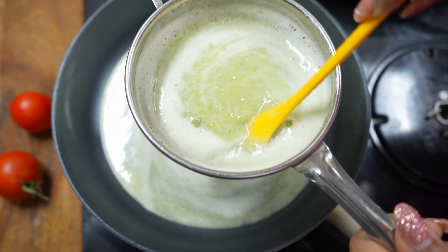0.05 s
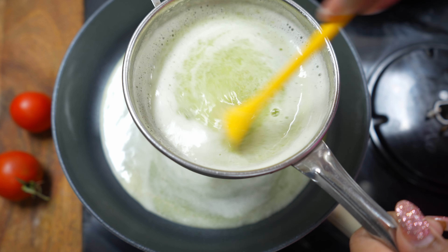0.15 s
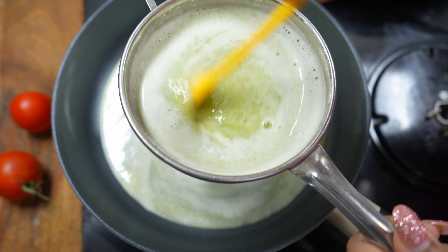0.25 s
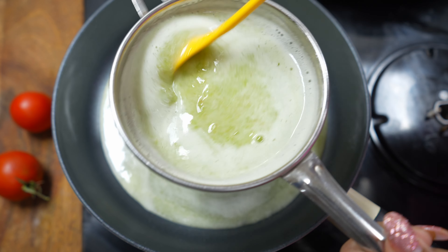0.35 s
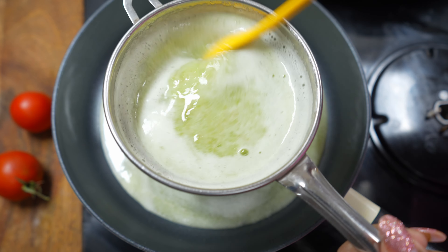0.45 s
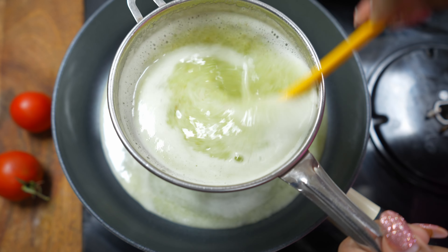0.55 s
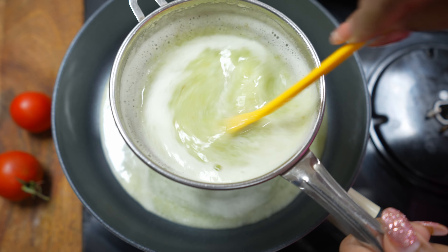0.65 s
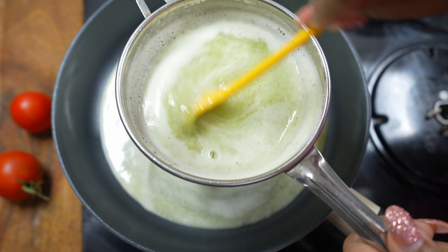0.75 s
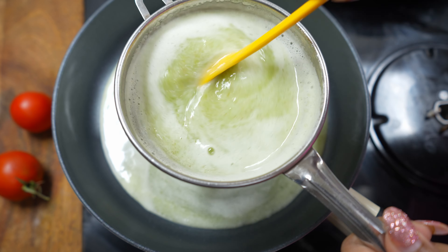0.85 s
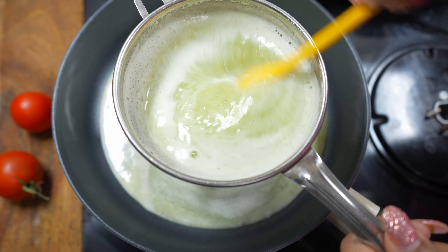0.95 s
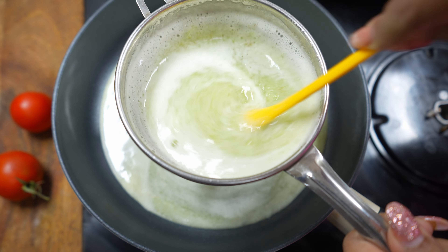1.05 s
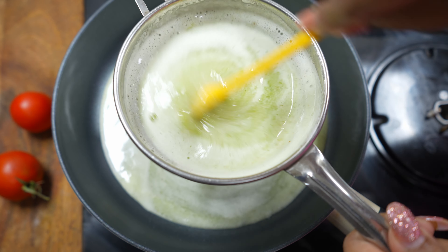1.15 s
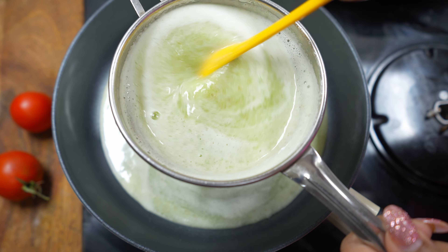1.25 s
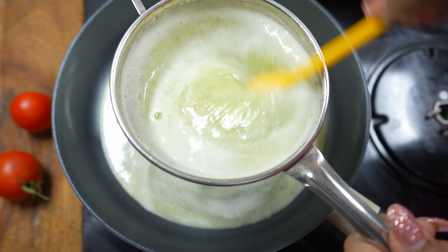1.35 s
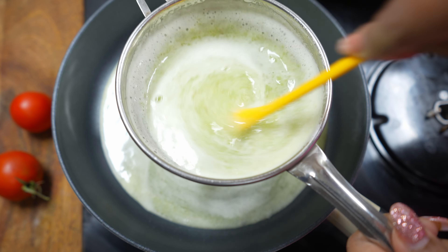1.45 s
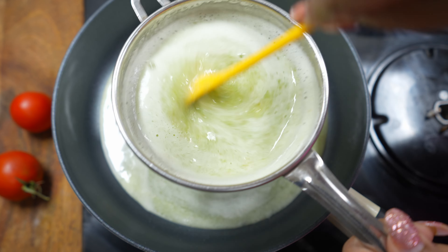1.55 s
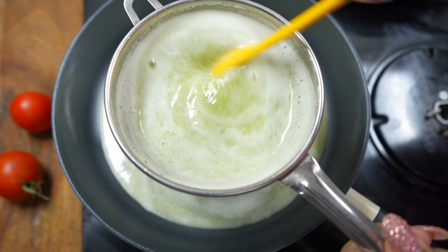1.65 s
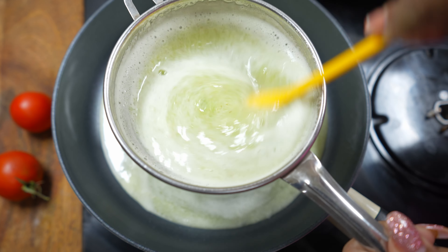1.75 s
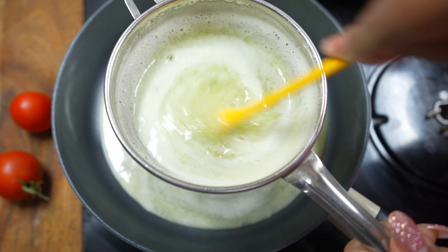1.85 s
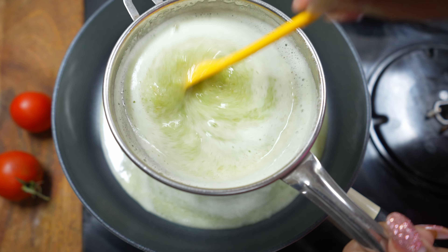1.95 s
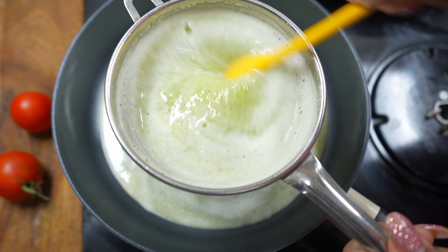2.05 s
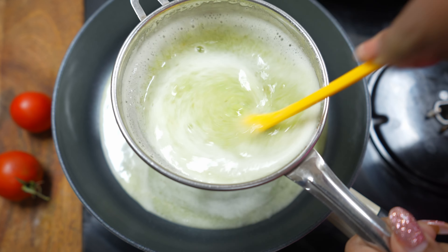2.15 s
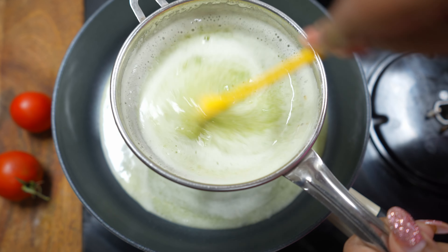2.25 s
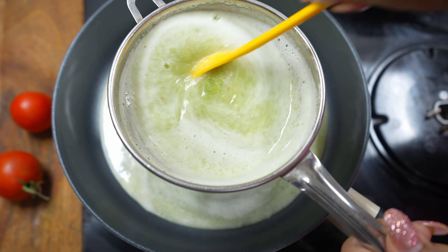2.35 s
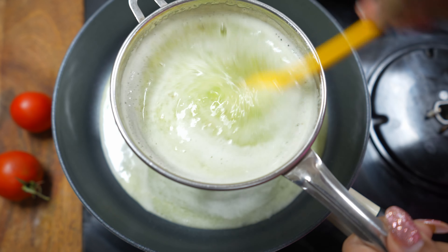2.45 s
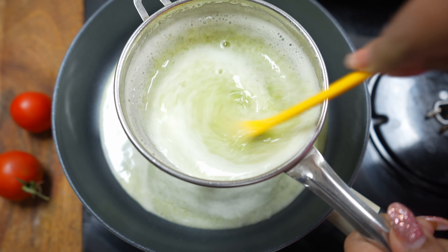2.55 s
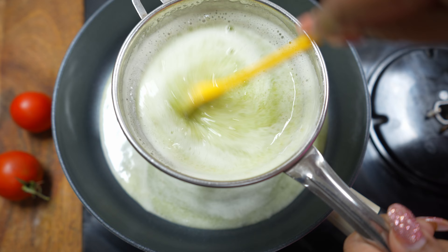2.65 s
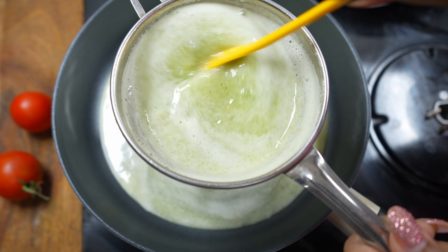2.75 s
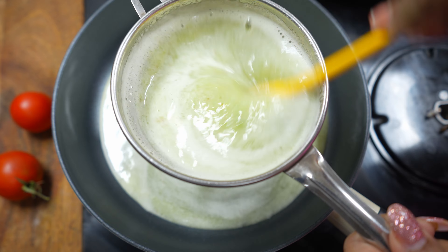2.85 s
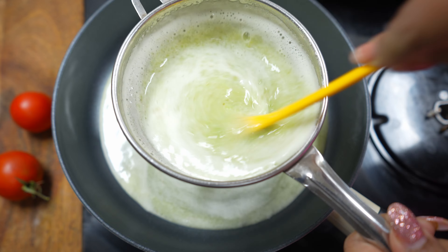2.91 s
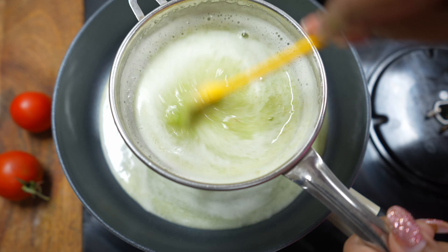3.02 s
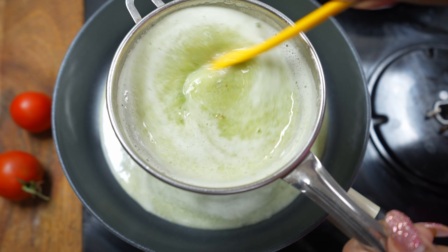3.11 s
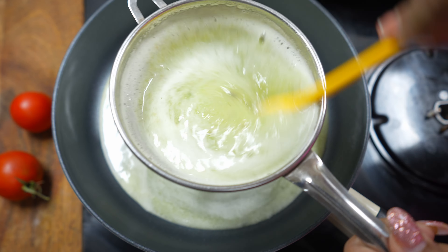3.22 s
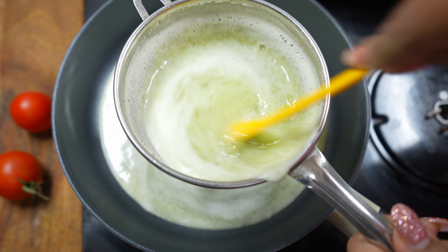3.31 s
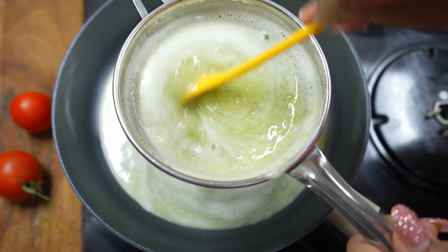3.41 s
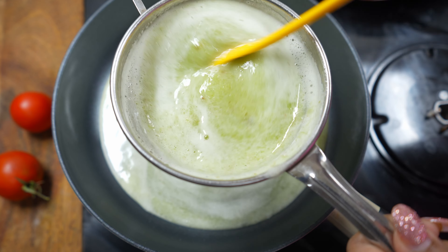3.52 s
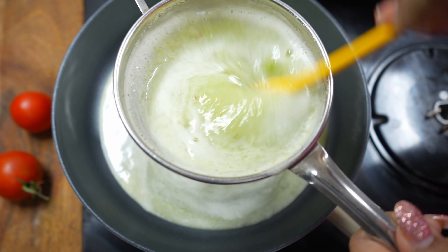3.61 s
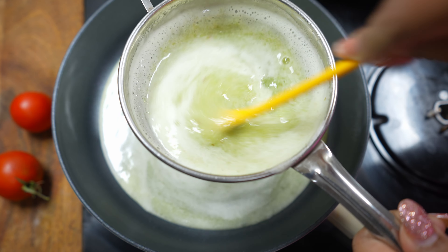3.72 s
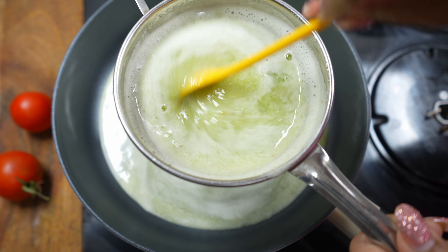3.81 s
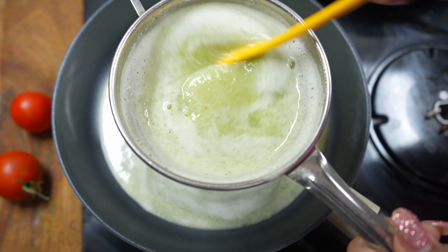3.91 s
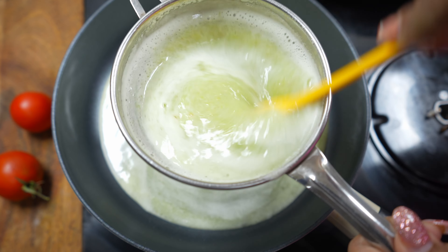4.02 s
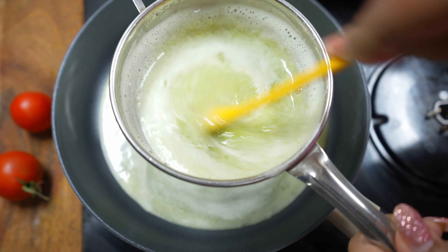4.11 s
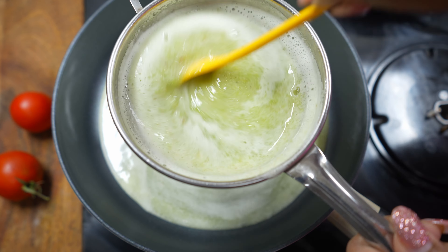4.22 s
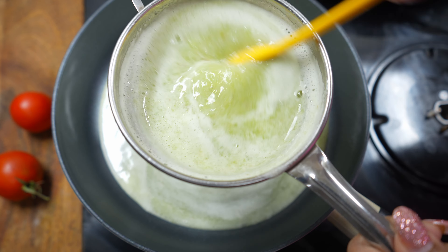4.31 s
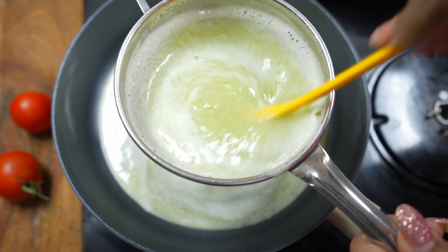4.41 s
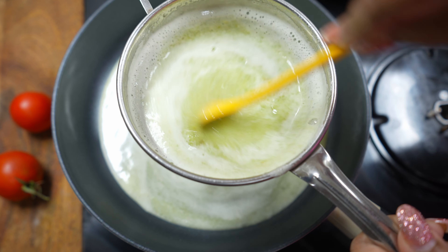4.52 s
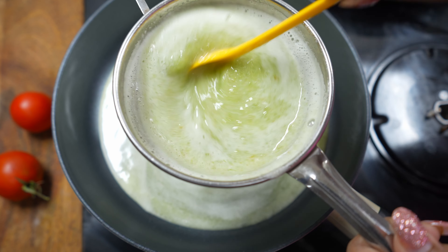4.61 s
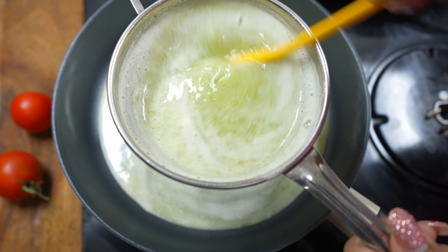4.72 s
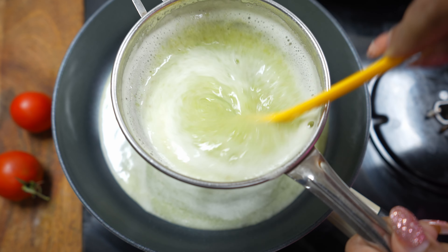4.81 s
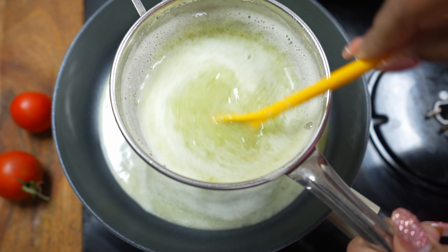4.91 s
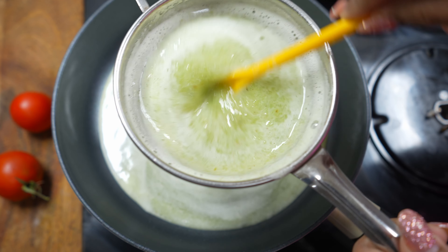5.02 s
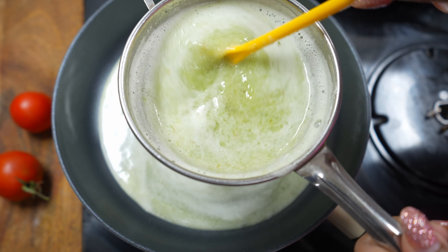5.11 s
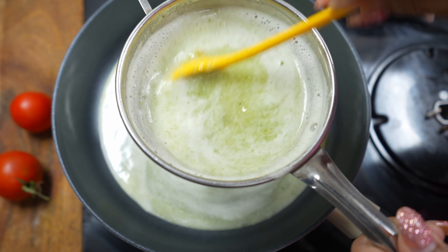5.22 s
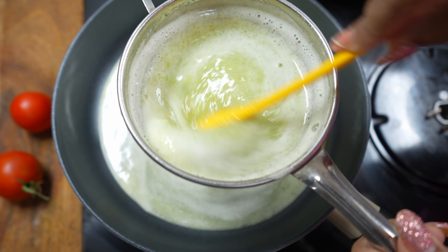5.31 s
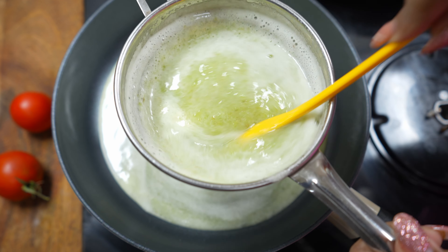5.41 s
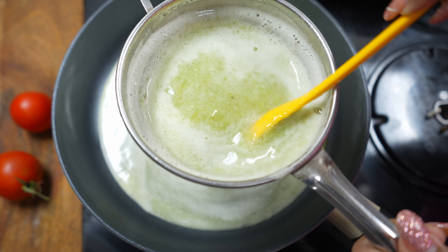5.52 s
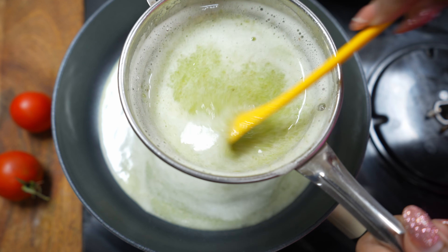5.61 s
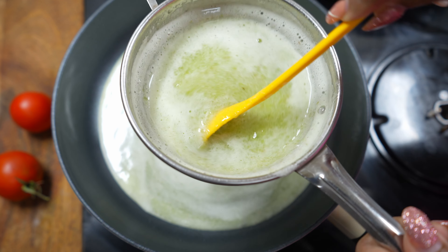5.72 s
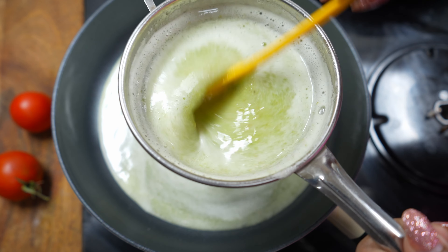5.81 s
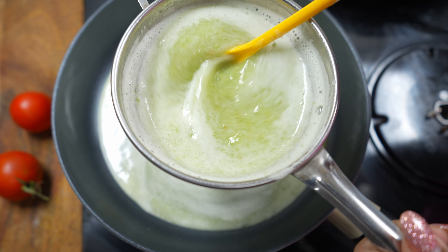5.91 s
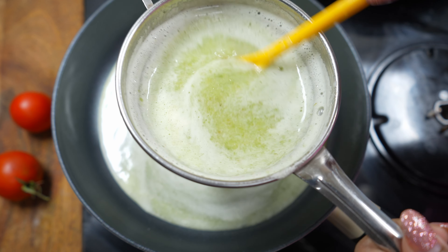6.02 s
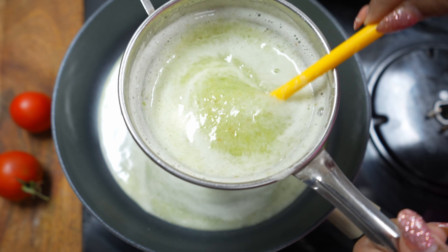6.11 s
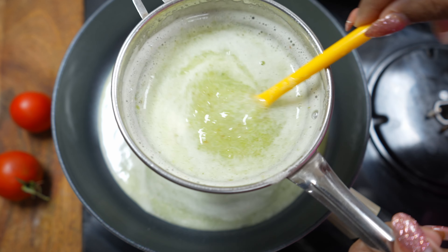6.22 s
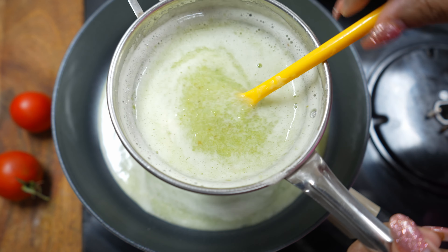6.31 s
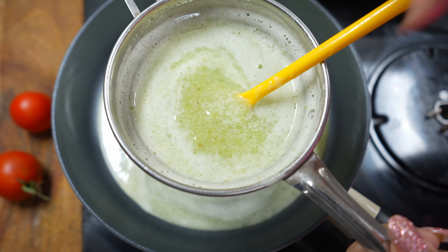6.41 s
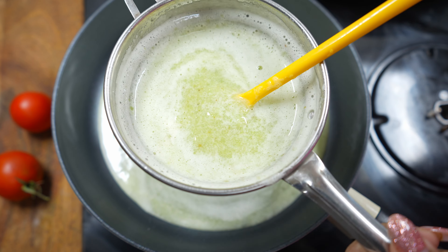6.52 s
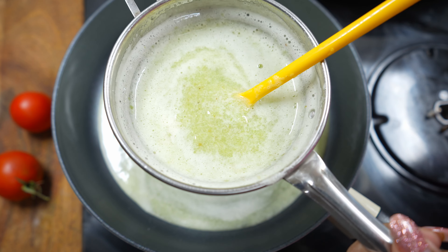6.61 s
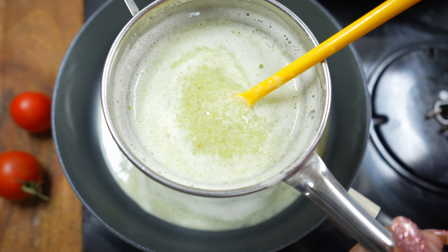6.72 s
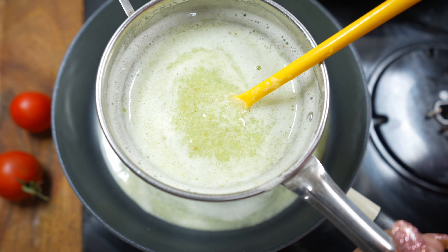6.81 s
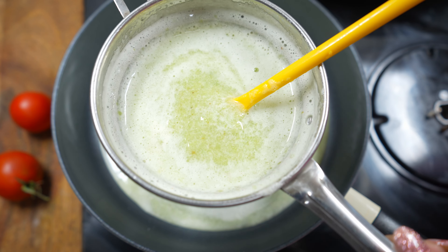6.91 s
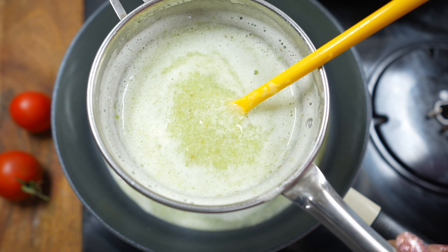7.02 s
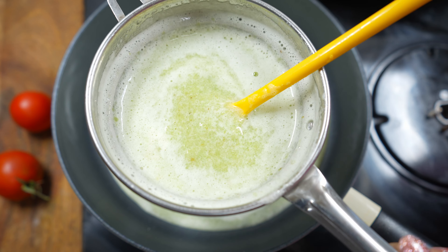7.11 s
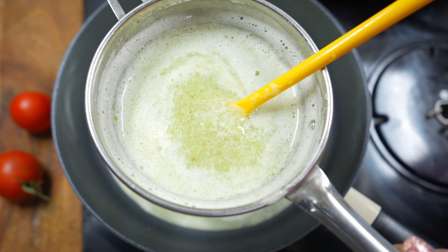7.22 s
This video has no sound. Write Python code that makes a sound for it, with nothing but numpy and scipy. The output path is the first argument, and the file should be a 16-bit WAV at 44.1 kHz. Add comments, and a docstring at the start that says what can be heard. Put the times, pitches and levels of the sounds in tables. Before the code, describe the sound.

A silicone blade briskly stirs thin puree in a steel sieve: low buzzy rubbing, wet slaps, occasional bright rim clinks, then near quiet.

```python
"""Wet, droning strokes, five or six a second, as a silicone spatula stirs puree round a steel mesh strainer.
Each bites, swells and eases off over a light drag: stick-slip of the blade excites the modes of the mesh,
the puree squelches, foam bursts and the wires rasp. Now and then the blade slaps or judders, and the frame
clinks and chatters on the bowl, once with a squeal. The stirring slows and stops, and the strainer is
shifted softly. A small kitchen adds its murmur and its reflections."""
import sys
import numpy as np
from scipy import signal
from scipy.fft import rfft, irfft
from scipy.io import wavfile
from scipy.ndimage import uniform_filter1d, minimum_filter1d, map_coordinates

SR = 44100
rng = np.random.default_rng(int(sys.argv[2]) if len(sys.argv) > 2 else 0)


def output_pcm(signal):
    """Save a mono or channel-first signal as 16-bit PCM at the path in sys.argv[1].

    Samples are clipped to [-1, 1] before scaling.
    """
    pcm = np.clip(np.atleast_2d(signal).T, -1, 1) * 32767
    wavfile.write(sys.argv[1], SR, np.round(pcm).astype(np.int16))


N = 319900
TIME = np.arange(N) / SR
BINS = np.fft.rfftfreq(16384, 1 / SR)  # frequency axis of every body's gain, Hz

# strokes of the blade: start_s, rise_s, ease_s, slip_rate_hz, belly_db (drag on the slack belly of the mesh),
# and relative to that: wall_db (taut wall), squelch_db (puree), rasp_db (wires)
BLADE_STROKES = [(-0.03, 0.025, 0.051, 441, -18.5, -3.5, -23, -22.5),
                 (0.152, 0.049, 0.019, 569.2, -14.5, 1.5, -8.5, -11.5),
                 (0.276, 0.011, 0.062, 438.4, -22.0, 0, -4.5, -8.5),
                 (0.38, 0.041, 0.041, 410.0, -26, -8, -4.5, -10.0),
                 (0.536, 0.0098, 0.035, 410.0, -6, -5.5, -12.5, -15.5),
                 (0.735, 0.027, 0.11, 500.5, -21.5, -0.5, -13.5, -27),
                 (0.835, 0.122, 0.12, 470.8, -15.5, -11, -19.5, -24),
                 (1.062, 0.099, 0.1, 530.0, -16, -1.5, -14, -21.0),
                 (1.231, 0.051, 0.069, 550.0, -18, -10, -16.5, -19.5),
                 (1.357, 0.02, 0.043, 430.0, -13, -8, -31, -26.5),
                 (1.462, 0.068, 0.092, 470.4, -15, -3, -16, -20.5),
                 (1.697, 0.071, 0.099, 551.2, -15.5, -10, -25, -22),
                 (1.84, 0.091, 0.042, 558.6, -13, -1.5, -19, -21),
                 (2.0, 0.052, 0.07, 499.7, -18.5, -16, -36, -26.0),
                 (2.101, 0.022, 0.11, 490.0, -13.5, -8, -24, -22.5),
                 (2.226, 0.073, 0.04, 560.0, -14.5, 0.5, -16, -22),
                 (2.391, 0.12, 0.039, 441.3, -14, -9.5, -32, -25),
                 (2.606, 0.039, 0.069, 470.2, -13.5, 0, -12.5, -19),
                 (2.769, 0.14, 0.011, 450.3, -10, -7, -22.5, -22),
                 (2.978, 0.079, 0.049, 539.8, -17.5, 2.5, -13.5, -20.5),
                 (3.15, 0.048, 0.01, 440.4, -15.0, -4.0, -25, -19.5),
                 (3.335, 0.039, 0.1, 480.0, -16, -2, -19.0, -19.5),
                 (3.577, 0.068, 0.086, 559.7, -12.5, -6, -25, -20.5),
                 (3.709, 0.044, 0.108, 490.0, -19.5, -1, -17.5, -17.5),
                 (3.883, 0.091, 0.01, 549.4, -22.0, -4, -26, -23.0),
                 (4.046, 0.0099, 0.039, 530.0, -19.5, -6, -16.5, -13),
                 (4.077, 0.076, 0.11, 549.4, -17.5, -0.5, -16, -20.0),
                 (4.334, 0.078, 0.054, 559.4, -12, -3.5, -19, -18.5),
                 (4.48, 0.15, 0.0098, 480.2, -17.5, -1, -14.5, -15.5),
                 (4.734, 0.088, 0.04, 580.0, -11.5, -5.5, -13.5, -18.5),
                 (4.975, 0.027, 0.093, 589, -21.0, 4, -14, -24),
                 (5.251, 0.094, 0.071, 430.4, -17.0, -4, -14.0, -17.5),
                 (5.586, 0.102, 0.019, 419.8, -19, 1, -13.5, -15),
                 (6.038, 0.082, 0.019, 479.8, -27.5, 1.0, -5.5, -14)]


def amp(db):
    """Level law: decibels to amplitude gain."""
    return 10 ** (np.asarray(db) / 20)


def evened(x):
    """Power normalisation: scales to rms 1."""
    return x / np.sqrt(np.mean(x ** 2) + 1e-20)


def read(points, hz):
    """Spectral interpolation: reads a table on a log-frequency axis."""
    point_hz, value = np.transpose(points)
    return np.interp(np.log(hz + 1), np.log(point_hz), value)


def add(mix, s, sound):
    """Superposition: mixes a sound in at time s."""
    part = mix[max(round(s * SR), 0):][:len(sound)]
    part += sound[:len(part)]


def wander(size, hz):
    """Band-limited chance: random knots, hz of them a second, joined by lines, with an expected rms of 1."""
    knots = rng.standard_normal(8192)
    line = map_coordinates(knots, [np.arange(size) * hz / SR], order=1, mode="wrap")
    return line * np.sqrt(3 / 2)  # the lines between knots lose a third of the power


def ring(gain):
    """Minimum phase: causal impulse response of energy 1 whose spectrum has the shape of gain on BINS."""
    cepstrum = irfft(np.log(np.maximum(gain / gain.max(), 1e-5)))
    half = len(BINS) - 1
    folded = 2 * cepstrum * (np.arange(2 * half) < half)  # the causal half alone
    response = irfft(np.exp(rfft(folded) - cepstrum[0]))[:half]
    return response / np.linalg.norm(response)


def modal(modes):
    """Modal superposition: the powers of the resonances add."""
    power = sum(amp(db) ** 2 / (1 + (2 * (BINS - hz) / width) ** 2) for hz, width, db in modes)
    return np.sqrt(power)


def band(low_hz, high_hz, order):
    """Band limitation: gain of a pass band with sloping skirts."""
    low_skirt = 1 + (low_hz / (BINS + 1)) ** (2 * order)
    high_skirt = 1 + (BINS / high_hz) ** (2 * order)
    return 1 / np.sqrt(low_skirt * high_skirt)


def through(x, gain):
    """Linear response: convolves a drive with the ring of a body."""
    return signal.oaconvolve(x, ring(gain))


def slips(size, per_s, jitter, spread_db):
    """Stick-slip: pulses at an unsteady rate and of uneven size, with a steady mean power of 1."""
    turns = np.cumsum(per_s * np.exp(jitter * wander(size, 300))) / SR
    releases = np.diff(np.floor(turns), prepend=-1)
    pulses = releases * amp(spread_db * rng.standard_normal(size))
    power = abs(uniform_filter1d(pulses ** 2, size=1500))
    return pulses / np.sqrt(power + 1e-9)


def mesh_gains():
    """Modal radiation of the belly and the wall; the open mesh radiates little bass."""
    # modes of the loaded mesh, slack belly and taut wall: pitch_hz, width_hz, level_db
    belly_modes = [(161.7, 20, -13.5), (277.7, 13.3, -7), (329.6, 9.6, -5.5), (351.3, 19, -4.5),
                   (414.7, 25, 3), (438, 28, -2.5), (506.3, 29, -1), (546, 28, -8.5), (566.2, 21.7, 2.5),
                   (663, 21, -1.5), (686.5, 15.4, 0), (757.4, 12.5, -5)]
    wall_modes = [(790, 15, -8), (827, 18.3, -3), (906, 9.7, -7), (955, 15.5, -3), (1017, 13.5, 0),
                  (1035, 26, -1), (1069, 29, -2.5), (1172, 21, -4.5), (1288, 15.6, -1.5), (1353, 31, -5.5),
                  (1391, 23, -6.5), (1441, 26, -9.5), (1580, 14, -21)]
    belly = modal(belly_modes) * band(143, 910, order=2) * band(11, 1170, order=4)
    wall = modal(wall_modes) * band(700, 1510, order=3)
    return belly, wall


def air():
    """Stationary noise: a steady low murmur of the room with a little hiss, shaped in frequency."""
    # spectrum of the quiet kitchen: frequency_hz, level_db
    murmur_spectrum = [(15, -54), (25, -26), (64, -12), (82, -6.5), (246, -3.5), (313, -3), (445, 1),
                       (782, -9.5), (1240, -11), (3090, -20.5), (3830, -16.5), (4750, -22), (15500, -32.5)]
    hz = np.fft.rfftfreq(N, 1 / SR)
    spectrum = rfft(rng.standard_normal(N)) * amp(read(murmur_spectrum, hz))
    return amp(-51.5) * evened(irfft(spectrum, N))


def pressure():
    """Contact force: gains of belly, wall, squelch and rasp, from a light drag, its lifts and the strokes."""
    # light drag of the blade between the strokes: time_s, belly_db
    light_drag = [(0.0, -29.5), (0.1, -41), (0.3, -30), (0.5, -44.5), (0.68, -30.5), (0.9, -30),
                  (2.6, -28.5), (3.4, -25), (4.6, -28.5), (4.92, -37.5), (5.2, -53.5), (5.8, -46.5),
                  (6.2, -48.5), (6.3, -57.6)]
    # moments when the drag changes, mostly as the blade lifts off the mesh: time_s, half_length_s, change_db
    blade_lifts = [(0.1, 0.028, -5), (.26, .015, -9), (1.445, 0.012, 1.5), (1.675, 0.015, -12),
                   (2.585, .022, -4), (3.135, .02, -6.5), (3.245, 0.034, -8), (3.558, .016, -10),
                   (4.032, .014, -10.5)]
    drag_parts_db = [0, 1.36, -8.5, -12]  # belly, wall, squelch, rasp relative to the belly
    trims_db = [-0.15, -0.3, 0.12, 0.9]  # the same four parts
    bite_power, eased_db, release_s, off_db = 0.58, -8, .2, -60  # levels relative to the crest
    # small random unevenness in loudness, its rms and rate
    uneven_db, uneven_hz = 1.0, 21.885
    rest_s = 6.3  # the blade lies still from here on

    t = np.arange(0, N / SR, 1 / 1000)
    contact_db = np.interp(t, *np.transpose(light_drag))
    for s, half_length, db in blade_lifts:
        contact_db = contact_db + db * np.exp(-((t - s) / half_length) ** 2)
    power = amp(contact_db + np.c_[drag_parts_db]) ** 2
    for start, rise, ease, _, db, *parts_db in BLADE_STROKES:
        # the stroke bites, eases off from its crest and then lets go
        corners = start + np.cumsum([rise, ease, release_s])
        fall_db = np.interp(t, corners, [0, eased_db, off_db], right=-np.inf)
        swell = np.clip((t - start) / rise, 0, 1) ** bite_power * amp(db + fall_db)
        power = power + (swell * amp(np.c_[[0, *parts_db]])) ** 2
    uneven = amp(uneven_db * wander(N, uneven_hz))
    common = uneven * np.clip((rest_s - TIME) / 0.098, 0, 1)
    return [common * amp(db) * np.interp(TIME, t, np.sqrt(part)) for part, db in zip(power, trims_db)]


def slip_rate():
    """Stick-slip frequency: slips a second, gliding from the crest of one stroke to the next."""
    start, rise, _, hz, *_ = np.transpose(BLADE_STROKES)
    return np.interp(TIME, start + rise, hz)


def levelled(drive, body, level):
    """Levelling: evens out the slow chance swings of the ringing mesh, so its loudness follows the level."""
    power = through(drive, body)[:N] ** 2
    for _ in range(2):
        power = uniform_filter1d(power, size=1800)
    return through(drive * level / np.sqrt(abs(power) + 0.013), body)[:N]


def sloshed(x, patch_db, patch_hz, patch_s):
    """Varying cavities: moving puree opens and shuts pockets, so patches of the spectrum come and go."""
    hz, t, z = signal.stft(x, SR, nperseg=512)
    place = np.meshgrid(hz / patch_hz, t / patch_s, indexing="ij")
    patches = map_coordinates(rng.standard_normal((128, 1024)), place, order=1, mode="wrap")
    gain = evened(amp(patch_db * evened(patches)))
    return signal.istft(z * gain, SR, nperseg=512)[1][:len(x)]


def bubbles(per_s, spread_db, cycles):
    """Bubble resonance: foam bursts as tiny rising pings of many sizes, rms 1; per_s counts each pitch."""
    out, t = np.zeros(N), np.arange(1024) / SR
    for hz in np.geomspace(1600, 6500, 24):
        rising = np.sin(2 * np.pi * hz * t * (1 + 6 * t))
        ping = rising * np.exp(-t * hz / cycles) * np.sqrt(hz)
        chance = rng.random(N)
        strength = np.minimum(rng.standard_exponential(N), 3)
        for at in np.flatnonzero(chance < per_s / SR):
            add(out, at / SR, ping * amp(spread_db * strength[at]))
    return evened(out)


def stirring():
    """Stick-slip excitation: the blade drives the mesh modes; puree squelches, foam bursts, wires rasp."""
    # resonances of the wet pocket behind the blade: pitch_hz, width_hz, level_db
    pocket_modes = [(1654, 140, -1), (1860, 124, -2.5), (2174, 420, -1.5), (2467, 155, 3), (2690, 53, -1.5)]
    # spectrum of the rasping wires: frequency_hz, level_db
    wire_spectrum = [(1400, -16.5), (2200, -5), (3000, 6), (3600, 4.5), (4800, 3), (5400, -4), (6800, -8),
                     (8000, -15), (10000, -20.5), (15500, -27)]
    belly_gain, wall_gain, pocket_gain, wire_gain = pressure()
    belly, wall = mesh_gains()

    grip = amp(1.31 * wander(N, 110))  # the grip on the wet steel is never even
    # the tip of the blade slips almost regularly, its long edge at random
    tip = grip * slips(N, per_s=slip_rate(), jitter=.2, spread_db=2.5)
    edge = grip * slips(N, per_s=420, jitter=.6, spread_db=3.0)
    tip, edge = (x - uniform_filter1d(x, size=220) for x in (tip, edge))  # no steady push

    fine_slips = slips(N, per_s=900, jitter=.7, spread_db=6.0)
    grit = grip * (0.64 * fine_slips + .5 * rng.standard_normal(N))
    grit = grit + 0.41 * (tip + edge)
    grit = grit + 0.13 * bubbles(per_s=10, spread_db=2.5, cycles=9.7)

    belly_drone = levelled(0.74 * tip + 0.68 * edge, belly, belly_gain)
    wall_drone = levelled(.5 * tip + 0.97 * edge, wall, wall_gain)
    drone = sloshed(belly_drone + wall_drone, patch_db=1.8, patch_hz=190, patch_s=.05)

    squelch = through(grit * pocket_gain, modal(pocket_modes) * band(1530, 2880, order=4))
    rasp = through(grit * wire_gain, amp(read(wire_spectrum, BINS)) * band(760, 20000, order=2))
    wet = sloshed(squelch + rasp, patch_db=2.6, patch_hz=380, patch_s=.03)
    return drone + amp(0.03) * wet[:N]


def catches():
    """Transient loading: slaps that die in a few slips, and judders where the slipping locks near one pitch."""
    # the blade slaps into the puree: time_s, belly_db, wall_db
    puree_slaps = [(0.1265, -19.5, -30), (.163, -13.5, -11), (.2752, -25, -21), (.757, -14, -19),
                   (1.464, -14, -21), (1.7, -15, -18), (2.629, -11, -20), (3.316, -17, -15.5),
                   (3.354, -15, -15), (3.578, -17, -16.5), (4.049, -13.5, -16), (4.963, -27, -21),
                   (4.9932, -22.5, -18), (5.254, -27, -23.5), (5.594, -24, -33), (6.052, -27, -32),
                   (6.097, -29, -22)]
    # the blade catches and judders: start_s, length_s, pitch_hz, level_db (before a common trim)
    blade_judders = [(0.534, 0.046, 378.4, -15), (1.37, .036, 426, -16), (1.882, 0.062, 567.4, -17),
                     (2.471, 0.039, 425, -17.5), (2.838, 0.045, 418, -19), (3.593, 0.061, 573, -17),
                     (4.046, .021, 511, -15.5), (4.988, 0.021, 1042, -13), (5.345, 0.071, 371, -22.5)]
    out, t = np.zeros(N), np.arange(SR // 12) / SR
    belly, wall = mesh_gains()
    for s, belly_db, wall_db in puree_slaps:
        push = .5 * slips(len(t), per_s=600, jitter=0.42, spread_db=5.0) * np.exp(-t / 0.013)
        push[0] = 10  # the first contact is the hardest
        add(out, s, amp(belly_db) * through(push, belly) + amp(wall_db) * through(push, wall))
    for s, length, hz, db in blade_judders:
        size = int(length * SR)
        phase = 2 * np.pi * np.cumsum(hz * (1 + 0.05 * wander(size, 225))) / SR
        overtone = 0.1 * np.sin(2 * phase) * (2 * hz < 1500)  # the mesh passes only low overtones
        tone = evened((np.sin(phase) + overtone) * amp(0.7 * wander(size, 270)))
        add(out, s, amp(db - 2.0) * tone * signal.windows.tukey(size, .15))
    return out


def frame():
    """Impact and friction: steel frame and bowl ring together, struck once or chattering in a skid."""
    # modes of the steel frame and of the bowl's rim: pitch_hz, width_hz, level_db
    steel_modes = [(520, 120, -8), (800, 60, -6), (1040, 60, 0), (1300, 60, -5), (1860, 60, -3),
                   (2126, 50, -5), (2552, 60, 2), (2720, 50, -2), (2975, 40, 6), (3180, 50, 1),
                   (3520, 50, -6), (3930, 60, -2), (4250, 60, -6), (4530, 60, -4), (4810, 60, -2),
                   (5400, 50, -13), (5690, 50, -14), (6390, 40, -13), (6882, 70, -2), (7270, 40, -11),
                   (8500, 300, -24), (9500, 500, -29), (13500, 3000, -36)]
    rim_modes = [(599, 190, -6), (865, 54, -2), (1040, 46, 5), (1260, 120, -3.5), (1890, 200, -1.5),
                 (2290, 52.8, -6), (2576, 130, -5), (2910, 160, -1.5), (3220, 83, -15), (3649, 100, -2),
                 (3900, 170, -3), (4602, 60, -15), (4670, 190, -4.5), (5383, 44, -27), (5700, 263, -8.5),
                 (7050, 300, -9.5), (7160, 90, -9), (8600, 750, -18.5), (12000, 3000, -38)]
    # the frame knocks on the bowl: time_s, level_db (before a common trim), brightness_db_per_octave,
    # bowl_share (of the ring, 0-1)
    bowl_clinks = [(0.4633, -5, -2, 0.01), (3.2081, -2, 1.5, 0.06), (3.3094, -13, 1, 0.41),
                   (3.3146, -6, -0.5, 0.7), (3.996, -11, -1, 0), (3.999, -3, 0.5, 0), (4.751, -5, 0, 0.09),
                   (4.768, -2.5, -0.5, 0), (4.925, -19.5, 1.5, 0.41), (5.3531, -15, 3.5, 0.62),
                   (5.436, -5.5, -0.5, 0.7), (5.9375, 3, -0.6, 0.8), (6.108, -23, 5.5, 0.1),
                   (6.1935, -25, -1, 0.3), (6.555, -25, -1, 1)]
    # the frame skids on the bowl: start_s, length_s, level_db, crest_place (0-1), screech_hz (centre)
    bowl_skids = [(0.5, 0.046, -16.5, 0.66, 3870), (3.207, 0.038, -13.5, 0.43, 3150),
                  (4.77, 0.047, -17.5, 0.63, 3676), (5.816, 0.013, -41.5, 0.14, 3476),
                  (5.847, 0.06, -36, 0.12, 2550)]
    out, t = np.zeros(N), np.arange(SR // 25) / SR
    steel, bowl = (modal(modes) * band(490, 17000, order=3) for modes in (steel_modes, rim_modes))
    blow = ring(band(20, 6200, order=3))[:len(t)]
    for s, db, bright, share in bowl_clinks:
        buzz = 0.13 * rng.standard_normal(len(t)) * np.exp(-t / 0.0044)  # the loose mesh buzzes after the blow
        tilt = amp(bright * np.log2((BINS + 100) / 3000))
        clink = through(blow + buzz, ((1 - share) * steel + share * bowl) * tilt)
        add(out, s, amp(db + 11.0) * clink / np.linalg.norm(clink))
    for s, length, db, crest, hz in bowl_skids:
        size = int(length * SR)
        swell = np.interp(np.linspace(0, 1, size), [0, crest, 1], [.1, 1, .05])
        chatter = slips(size, per_s=640, jitter=0.55, spread_db=4) * swell
        screech = 0.74 + np.exp(-(np.log2((BINS + 1) / hz) / 0.61) ** 2)
        add(out, s, amp(db) * through(chatter, (steel + 0.19 * bowl) * screech))
    return out


def squeal():
    """Friction-driven oscillation: steel whistles, slightly unsteadily, on the glaze as the first skid bites."""
    start_s, length_s, pitch_hz, level_db = .512, .04, 4780, -27
    out, size = np.zeros(N), int(length_s * SR)
    phase = 2 * np.pi * np.cumsum(pitch_hz * (1 + 0.0078 * wander(size, 300))) / SR
    whistle = evened(np.sin(phase) * amp(2.5 * wander(size, 200)))
    add(out, start_s, amp(level_db) * whistle * signal.windows.tukey(size, .5))
    return out


def shifts():
    """Damped resonance: soft rubs and taps, grains that swell and die in one resonance."""
    # shifts and taps as the stirring ends: time_s, rise_s, t60_s, centre_hz,
    # half_width_octaves (to half the amplitude), level_db
    soft_shifts = [(6.498, .003, .09, 2010, 0.1, -38), (6.512, 0.012, 0.92, 294, 0.46, -38),
                   (6.742, 0.0053, 0.31, 1270, 0.28, -35.5), (6.745, 0.021, 0.67, 1800, .66, -44.5),
                   (6.75, 0.076, 0.54, 675, 0.65, -37.5), (7.179, .008, .21, 1160, 0.16, -47),
                   (7.224, .031, .3, 600, 1.2, -51)]
    out, t = np.zeros(N), np.arange(SR // 2) / SR
    for s, rise, t60, hz, width, db in soft_shifts:
        colour = 1 / (1 + (np.log2((BINS + 1) / hz) / width) ** 2) * band(79, 3500, order=3)
        grains = slips(len(t), per_s=1500, jitter=0.78, spread_db=3)
        rub = evened(through(grains, colour)[:len(t)])
        decay_db = -60 * np.maximum(t - rise, 0) / t60
        add(out, s, rub * np.minimum(t / rise, 1) * amp(db + decay_db))
    return out


def kitchen(x):
    """Reverberation: dense reflections off worktop and walls, each band dying at its own speed."""
    # ring of the kitchen: frequency_hz, t60_s
    decay_times = [(200, 0.35), (800, 0.19), (2500, 0.24), (6000, 0.24), (14000, 0.35)]
    size = SR // 2
    signs = rng.choice([-1., 1.], size)
    sparse = rng.random(size) < 1 / 10
    taps = signs * sparse * (np.arange(size) > .004 * SR)  # none in the first 4 ms
    hz, t, z = signal.stft(taps, SR, nperseg=256)
    decay = amp(-60 * t / read(decay_times, hz)[:, None])
    tail = signal.istft(z * decay, SR, nperseg=256)[1]
    return signal.oaconvolve(x, tail / np.linalg.norm(tail))[:N]


def scene():
    """Direct and reverberant field: mesh and frame close by; exposed steel reaches the walls more strongly."""
    mesh = stirring() + catches()
    steel = frame() + squeal()
    room = kitchen(amp(-11) * mesh + amp(-6.5) * steel)
    return (mesh + steel + room + shifts() + air())[None]


def record(dry):
    """Peak limiting and band limitation: a quick limiter catches the loudest peaks, then a low-pass."""
    gain = minimum_filter1d(np.minimum(1, .88 / (abs(dry) + 1e-9)), size=301)
    limited = dry * uniform_filter1d(gain, size=301)
    low_pass = signal.firwin(511, 15850, window=("kaiser", 9), fs=SR)
    return signal.oaconvolve(limited, low_pass[None], "same")


dry = scene()
out = record(dry)
output_pcm(out)
```